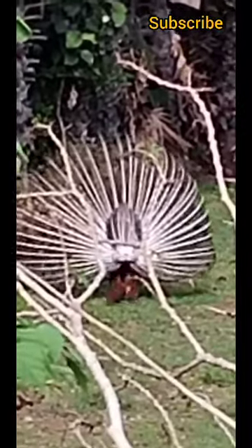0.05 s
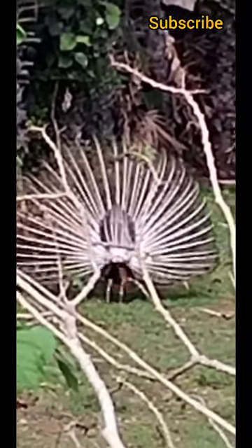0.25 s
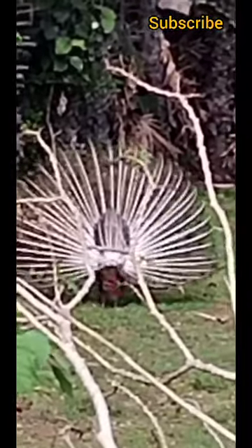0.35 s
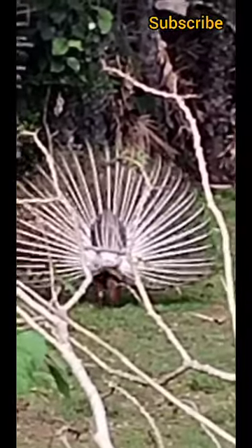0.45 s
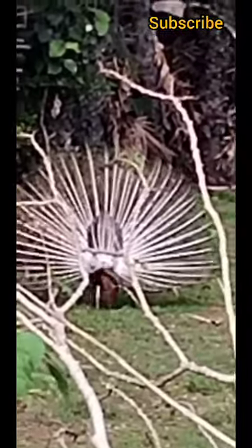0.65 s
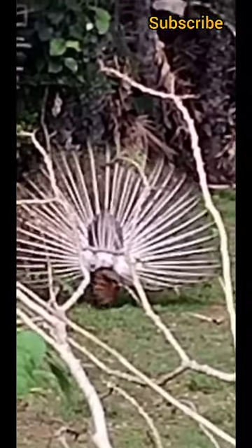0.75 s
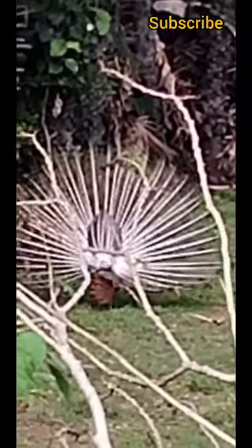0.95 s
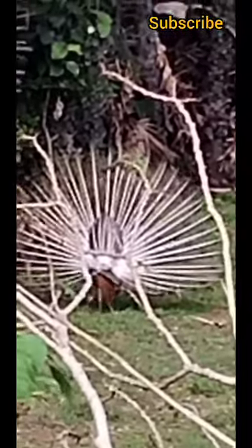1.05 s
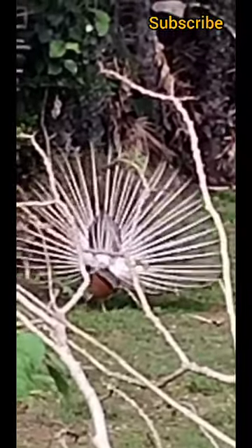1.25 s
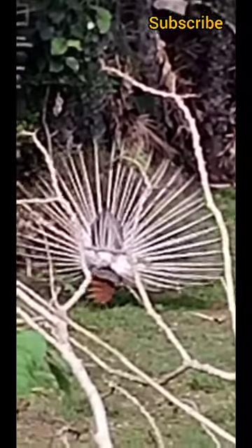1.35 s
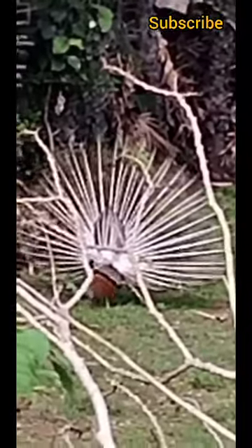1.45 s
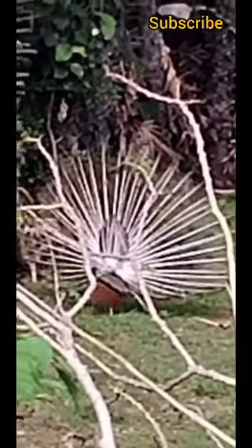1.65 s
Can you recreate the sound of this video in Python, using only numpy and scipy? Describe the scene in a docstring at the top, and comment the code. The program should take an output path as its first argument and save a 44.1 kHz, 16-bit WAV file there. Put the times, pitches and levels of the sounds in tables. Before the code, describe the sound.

A small bird gives two bright rising chirps by a tree-lined lawn. Thin falling whistles follow, with three high buzzy trills and a faint, distant rooster crow. Light wind rumbles on the microphone and bumps it once.

```python
"""A small bird gives two bright rising chirps at the wooded edge of a farm lawn; others slur thin
whistles downward, each a gliding, nearly pure tone. A high, insect-like trill, buzzy from its fast
pitch swing, comes three times, and a far rooster crows with harmonics and rasp shaped by its throat.
Trees scatter every call. Underneath lie outdoor hush, distant insects and faint rustles, while
light wind rumbles on the microphone and bumps it once."""
import sys
import numpy as np
from scipy import signal
from scipy.fft import rfft, irfft
from scipy.io import wavfile

SR = 44100
rng = np.random.default_rng(int(sys.argv[2]) if len(sys.argv) > 2 else 0)


def wav_out(sig):
    """Save sig, one row per channel (or a flat mono array), as 16-bit PCM at SR to the path in sys.argv[1]."""
    wavfile.write(sys.argv[1], SR, np.round(np.clip(np.atleast_2d(sig).T, -1, 1) * 32767).astype(np.int16))


N = 74970

# Tone colour of the outdoor hush: frequency_hz, gain_db
HUSH_EQ = [(100, 8.5), (350, 3), (700, 0.5), (1100, -1.5), (1800, -2.5), (2400, -9.5), (3200, -12),
           (4600, -13), (5800, -34), (6600, -17.5), (7700, -15.5), (9000, -23), (12000, -26.5),
           (15500, -30)]
# Tone colour of the wind rumble: frequency_hz, gain_db
WIND_EQ = [(10, -25), (22, -5.5), (45, -6.5), (65, 4.5), (90, -7), (130, -8.5), (180, -19), (260, -33.5),
           (500, -67), (2000, -80)]
# Rise and fall of the wind: time_s, level_db
GUSTS = [(0, -38.5), (.13, -52), (.25, -39), (.36, -49), (.44, -42), (.56, -40), (.66, -45.5), (.78, -42),
         (.97, -44), (1.07, -38.5), (1.17, -43.5), (1.25, -45), (1.36, -42), (1.46, -45), (1.58, -44),
         (1.7, -42)]
# Buffets that make up the bump on the microphone: centre_s, level_db, pitch_hz, width_s
BUFFETS = [(0.843, -26.5, 79.8, 0.0045), (0.877, -21.5, 87.8, 0.0094), (0.914, -27, 73, 0.0075)]
# Tone colour of the turbulence around the bump: frequency_hz, gain_db
TURBULENCE_EQ = [(15, -14), (40, 7), (100, -9), (170, -5.5), (260, -25.5), (600, -67), (2000, -87)]
# Faint dry rustles: start_s, length_s, level_db
RUSTLES = [(0.555, 0.038, -69), (0.85, 0.034, -64.5), (0.904, 0.12, -74)]
# Contour of the rooster's crow: time_s, pitch_hz, clear_gain_db, rasp_gain_db
CROW = [(0.386, 428, -81, -73), (.415, 427.1, -61, -73), (0.454, 425.7, -60, -59.5), (.525, 410, -64, -72),
        (0.547, 388.6, -53, -73), (0.593, 395.1, -53.5, -64.5), (0.678, 397.5, -71, -62),
        (.79, 401.7, -68, -63.5), (0.979, 416.5, -70, -62.5), (1.04, 422.6, -72, -59.5),
        (1.085, 420, -60.5, -64), (1.116, 427.6, -55.5, -62.5), (1.15, 431, -76, -62.5),
        (1.33, 396, -72, -71)]
# Main throat resonance, moving as the beak opens and closes: time_s, resonance_hz
BEAK = [(.4, 1730), (.45, 1580), (.515, 1630), (.545, 1810), (.7, 1910), (.95, 1950), (1.05, 1787),
        (1.3, 1770)]
# Weaker, steady throat resonances: centre_hz, width_hz, gain_db
THROAT = [(390, 100, -9), (1170, 200, -10), (2740, 200, -14)]
# Buzzy trills: start_s, length_s, gain_db
TRILLS = [(0.064, .32, -58), (0.649, 0.29, -58), (1.445, 0.26, -57)]
# Tone colour of the trills: frequency_hz, gain_db
TRILL_EQ = [(4700, -2), (5050, -5), (5500, -3), (5900, 4), (6060, 6.5), (6160, -13), (6500, -9)]
# A run of falling whistles that builds in length and level: start_s, length_s, level_db
SLURS = [(0.646, .022, -72), (0.812, .03, -69.5), (0.967, .062, -65.5), (1.152, .072, -63),
         (1.339, .075, -61.5), (1.523, .055, -62)]
# Single notes of other birds: start_s, length_s, from_hz, to_hz, level_db
NOTES = [(1.237, 0.054, 3865, 3650, -65), (1.247, 0.044, 2485, 2270, -66),
         (1.324, 0.042, 2980, 3230, -71.5), (1.386, 0.055, 3840, 3534, -62),
         (1.484, 0.062, 3280, 3410, -71), (1.527, 0.028, 3026, 1930, -59.5),
         (1.536, 0.054, 2444, 2160, -62.5), (1.583, .12, 2062, 1924, -65), (1.605, .065, 3030, 3270, -71),
         (1.631, 0.045, 3920, 3650, -65.5), (1.66, 0.074, 3340, 3350, -64)]
# The two rising chirps: start_s, gain_db, length_s
CHIRPS = [(0.056, -47, .055), (0.225, -47.5, 0.064)]
# Contour of each chirp: share_of_length, pitch_hz, gain_db
CHIRP_SHAPE = [(0, 2600, -14), (.09, 3040, -12), (.27, 3470, -8.5), (.35, 3715, -1.5), (.44, 3793, -2),
               (.57, 3895, -15), (.75, 3940, -4.5), (1, 3710, -33)]
# Distinct echoes off the trees: delay_s, gain_db
TREE_ECHOES = [(.021, -6), (.036, -35), (.072, -12)]
# Narrow dips in the microphone's response: centre_hz, width_hz
MIC_NOTCHES = [(4020, 150), (8000, 200)]


def amp(db):
    """Decibels to gain."""
    return 10 ** (np.asarray(db) / 20)


def unit_rms(x):
    """Scales to rms 1."""
    return x / np.sqrt(np.mean(x ** 2) + 1e-20)


def add(mix, start_s, sound):
    """Drops a sound into the mix."""
    part = mix[max(round(start_s * SR), 0):][:len(sound)]
    part += sound[:len(part)]


def equalise(x, curve):
    """Applies an EQ curve of frequency_hz, gain_db points."""
    hz, db = np.transpose(curve)
    gain_db = np.interp(np.log(np.fft.rfftfreq(N, 1 / SR) + 1), np.log(hz), db)
    return irfft(rfft(x) * amp(gain_db), N)


def drift(rate_hz):
    """Smooth random motion of rms 1, rolling off above rate_hz."""
    hz = np.fft.rfftfreq(N, 1 / SR)
    spectrum = rfft(rng.standard_normal(N)) * (hz > 0) / (1 + (hz / rate_hz) ** 4)
    return unit_rms(irfft(spectrum, N))


def resonate(x, hz, width_hz):
    """A sweepable resonance of gain 1, applied twice for steep sides."""
    carrier = np.exp(2j * np.pi * np.cumsum(hz * np.ones(len(x))) / SR)
    pole = np.exp(-np.pi * width_hz / SR)
    baseband = signal.lfilter([(1 - pole) ** 2], [1, -2 * pole, pole * pole], x / carrier)
    return 2 * (carrier * baseband).real


def noise_band(hz, width_hz):
    """Noise through one resonance, rms 1."""
    return unit_rms(resonate(rng.standard_normal(N), hz, width_hz))


def shaped_noise(curve):
    """Noise through an EQ curve, rms 1."""
    return unit_rms(equalise(rng.standard_normal(N), curve))


def tone(hz):
    """A sine of rms 1 that follows a pitch curve."""
    return np.sqrt(2) * np.sin(2 * np.pi * np.cumsum(hz) / SR)


def gate(t, length, attack, release):
    """Smooth attack, hold and release, all in the units of t."""
    fade_in = np.sin(np.pi / 2 * np.clip(t / attack, 0, 1))
    fade_out = np.sin(np.pi / 2 * np.clip((length - t) / release, 0, 1))
    return fade_in * fade_out


def tree_scatter(x, t60_s):
    """Diffuse reverb tail: thousands of tiny reflections off leaves and trunks."""
    reflections_per_s, predelay_s = 3000, 0.004
    t = np.arange(SR) / SR
    taps = rng.standard_normal(SR) * (rng.random(SR) < reflections_per_s / SR)
    taps *= amp(-60 * t / t60_s) * (t > predelay_s)
    return signal.fftconvolve(x, taps / np.linalg.norm(taps))[:N]


def air():
    """The bed: soft outdoor hush with a thin band of distant insects."""
    hush = amp(-58 + 0.5 * drift(rate_hz=9)) * shaped_noise(HUSH_EQ)
    insects = noise_band(hz=5754, width_hz=1130) * amp(-69 + 0.5 * drift(rate_hz=63))
    return hush + insects


def wind():
    """Lumpy rumble on the microphone, and one bump: three quick buffets in a puff of turbulence."""
    puff_start_s, puff_db = 0.797, -45.5
    t = np.arange(N) / SR
    gust_db = np.interp(t, *np.transpose(GUSTS)) - 2.5 * drift(rate_hz=10)
    rumble = amp(gust_db) * shaped_noise(WIND_EQ)
    for centre_s, level_db, pitch_hz, width_s in BUFFETS:
        swell = np.exp(-0.5 * ((t - centre_s) / width_s) ** 2)
        rumble -= amp(level_db) * swell * np.cos(2 * np.pi * pitch_hz * (t - centre_s))
    puff = amp(puff_db) * gate(t - puff_start_s, length=0.17, attack=0.097, release=0.028)
    return rumble + puff * shaped_noise(TURBULENCE_EQ)


def rustles():
    """Short, soft puffs of high noise, like feathers."""
    t = np.arange(N) / SR
    envelope = sum(amp(level_db) * gate((t - start_s) / length_s, length=0.74, attack=0.54, release=0.39)
                   for start_s, length_s, level_db in RUSTLES)
    return envelope * noise_band(hz=7100, width_hz=990)


def rooster():
    """A far crow through throat and beak: clear opening notes, a long hoarse middle, a fading end."""
    beak_shut_hz, beak_open_hz = 1580, 2030
    t = np.arange(N) / SR
    times_s, *contours = np.transpose(CROW)
    pitch_hz, clear_db, rasp_db = (np.interp(t, times_s, contour) for contour in contours)
    beak_hz = np.interp(t, *np.transpose(BEAK))
    pulses = sum(tone(harmonic * pitch_hz) for harmonic in range(1, 9))
    clear = resonate(pulses, beak_hz, width_hz=250)
    clear += sum(amp(db) * resonate(pulses, hz, width_hz) for hz, width_hz, db in THROAT)
    # A second, higher resonance brightens the rasp as the beak opens.
    opening = np.clip((beak_hz - beak_shut_hz) / (beak_open_hz - beak_shut_hz), 0, 1)
    upper_rasp = opening * amp(-3.5) * noise_band(hz=2520, width_hz=220)
    rasp = noise_band(beak_hz, width_hz=960) + upper_rasp
    envelope = gate(t - times_s[0], times_s[-1] - times_s[0], attack=0.01, release=0.03)
    dry = envelope * (amp(clear_db) * clear + amp(rasp_db) * rasp)
    return amp(-2) * dry + amp(-12.5) * tree_scatter(dry, t60_s=1)


def trills():
    """A high tone swung rapidly up and down, louder on the upswing, blurred by the trees."""
    centre_hz, swing_hz, wander_hz = 5502, 336, 132.3
    buzz_rate_hz, rate_jitter, tremolo_depth = 188, 0.058, 0.1
    scoop_hz, scoop_s = 450, 0.035  # each trill slides in from below
    dry = np.zeros(N)
    for start_s, length_s, gain_db in TRILLS:
        t = np.arange(0, length_s, 1 / SR)
        swing = tone(buzz_rate_hz * (1 + rate_jitter * drift(rate_hz=17)[:len(t)])) / np.sqrt(2)
        pitch_hz = centre_hz + swing_hz * swing - scoop_hz * np.exp(-t / scoop_s)
        pitch_hz += wander_hz * drift(rate_hz=123.4)[:len(t)]
        envelope = gate(t, length_s, attack=0.039, release=0.041) * (1 + tremolo_depth * swing)
        add(dry, start_s, amp(gain_db) * envelope * tone(pitch_hz))
    return equalise(amp(-6.5) * dry + amp(-2.5) * tree_scatter(dry, t60_s=0.43), TRILL_EQ)


def whistle(length_s, from_hz, to_hz, bend, flutter):
    """A nearly pure gliding note; more bend settles it sooner, flutter is a share of the pitch."""
    progress = np.arange(0, length_s, 1 / SR) / length_s
    slide = (1 - np.exp(-bend * progress)) / (1 - np.exp(-bend))
    wobble = 1 + flutter * drift(rate_hz=360)[:len(progress)]
    pitch_hz = (from_hz + (to_hz - from_hz) * slide) * wobble
    return gate(progress, length=0.95, attack=0.15, release=0.1) * tone(pitch_hz)


def whistling_birds():
    """A run of downward slurs and stray notes from farther off, washed in tree reverb."""
    dry = np.zeros(N)
    for start_s, length_s, level_db in SLURS:
        slur = whistle(length_s, from_hz=4540, to_hz=4156, bend=3.53, flutter=0.018)
        add(dry, start_s, amp(level_db) * slur)
    for start_s, length_s, from_hz, to_hz, level_db in NOTES:
        add(dry, start_s, amp(level_db) * whistle(length_s, from_hz, to_hz, bend=0.82, flutter=0.019))
    return dry + amp(-3.5) * tree_scatter(dry, t60_s=1)


def chirping_bird():
    """The lead voice: a soft low pickup, then a fast upward sweep that hooks over; the trees echo it."""
    pickup_ahead_s, pickup_gain_db, flutter = 0.034, -15.5, 0.011
    shares, shape_hz, shape_db = np.transpose(CHIRP_SHAPE)
    dry = np.zeros(N)
    for start_s, gain_db, length_s in CHIRPS:
        t = np.arange(0, length_s, 1 / SR)
        wobble = 1 + flutter * drift(rate_hz=210)[:len(t)]
        pitch_hz = np.interp(t / length_s, shares, shape_hz) * wobble
        level_db = gain_db + np.interp(t / length_s, shares, shape_db)
        envelope = amp(level_db) * gate(t, length_s, attack=0.0014, release=0.0035)
        add(dry, start_s, envelope * tone(pitch_hz))
        pickup = whistle(length_s=0.0305, from_hz=2700, to_hz=1979, bend=2.73, flutter=0.09)
        add(dry, start_s - pickup_ahead_s, amp(gain_db + pickup_gain_db) * pickup)
    mix = dry + amp(-2) * tree_scatter(dry, t60_s=0.45)
    for delay_s, gain_db in TREE_ECHOES:
        add(mix, delay_s, amp(gain_db) * dry)
    return mix


def scene():
    """All layers mixed to mono."""
    return (chirping_bird() + whistling_birds() + trills() + rooster() + rustles() + wind() + air())[None]


def record(dry):
    """The microphone's two narrow dips, then a steep high cut."""
    for centre_hz, width_hz in MIC_NOTCHES:
        dry = signal.lfilter(*signal.iirnotch(centre_hz, centre_hz / width_hz, SR), dry)
    high_cut = signal.firwin(511, cutoff=15700, window=("kaiser", 9), fs=SR)
    return signal.oaconvolve(dry, high_cut[None], "same")


dry = scene()
out = record(dry)
wav_out(out)
```